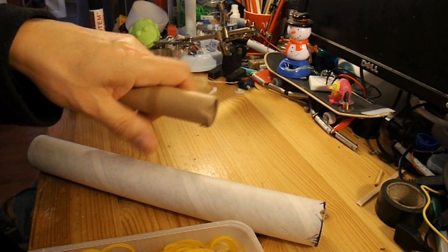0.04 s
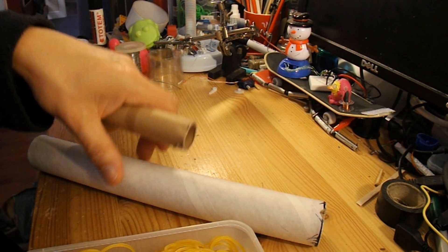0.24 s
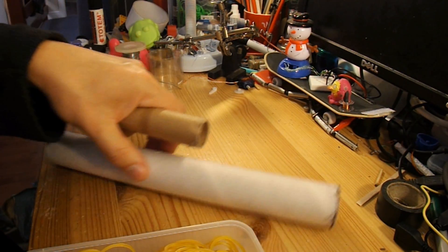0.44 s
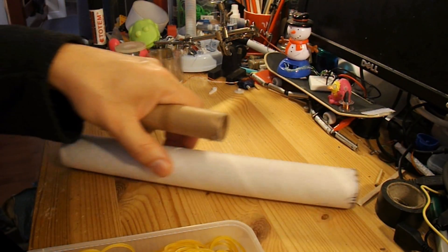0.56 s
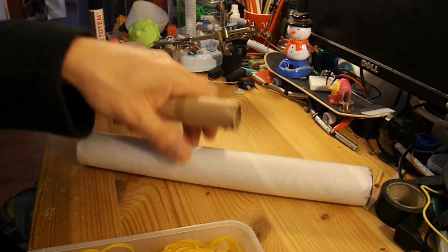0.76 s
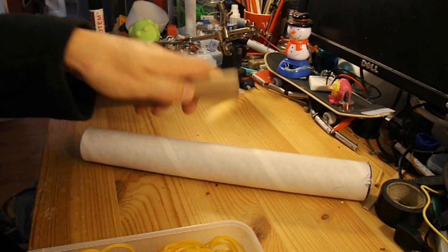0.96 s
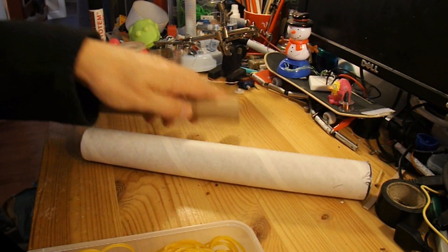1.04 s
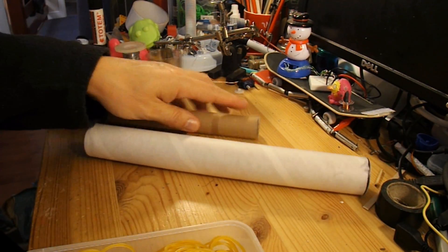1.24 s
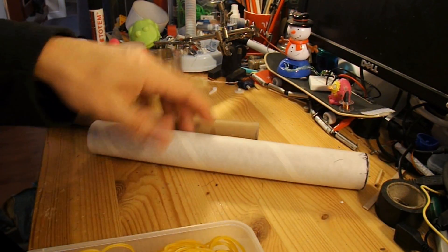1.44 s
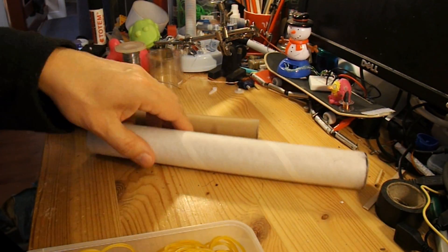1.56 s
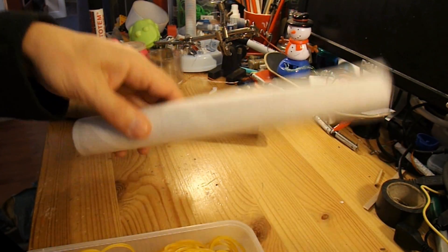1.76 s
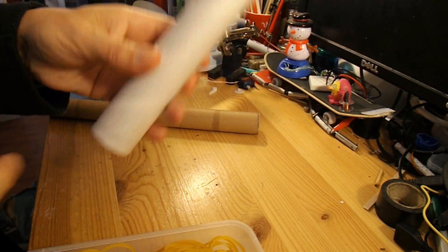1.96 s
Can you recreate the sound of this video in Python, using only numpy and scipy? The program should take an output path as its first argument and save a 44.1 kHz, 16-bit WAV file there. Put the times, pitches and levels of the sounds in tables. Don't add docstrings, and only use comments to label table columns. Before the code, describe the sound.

Close and nearly mono in a small quiet room: faint papery handling and scraping, a crisp tiny tick, a quick cluster of hollow cardboard knocks on wood, then only light skin-on-paper rustle over soft hiss.

```python
import sys
import numpy as np
from scipy import signal
from scipy.fft import rfft, irfft
from scipy.io import wavfile

SR = 44100
rng = np.random.default_rng(int(sys.argv[2]) if len(sys.argv) > 2 else 0)


def natural_amplitude(level_db):
    exponent = np.asarray(level_db, float) / 20
    return 10 ** exponent


def to_wav(s):
    ch = np.atleast_2d(s).T
    pcm = np.round(np.clip(ch, -1, 1) * 32767)
    wavfile.write(sys.argv[1], SR, pcm.astype(np.int16))


N = 88508

# [f/Hz, level/dB]
HUSH_SPECTRUM = [(25, -34), (120, -18.5), (400, -3), (2500, -5.5), (6600, -8.5), (9000, -7.5), (13500, -14),
                 (16000, -10.5)]
# [t/s, rumble level/dB]
ARM_WEIGHT = [(0, -90), (.1, -98), (.33, -93), (.42, -80), (.53, -73), (.6, -86), (.72, -98), (.8, -81),
              (0.921, -104), (1.2, -98), (1.4, -92), (1.52, -74), (1.65, -79.5), (1.699, -88), (1.85, -89),
              (1.95, -81), (2.01, -88)]
# [f/Hz, level/dB]
RUMBLE_SPECTRUM = [(15, -40), (35, -24), (70, -9.5), (100, -3.5), (140, 1), (175, -18), (300, -60)]
# [start t/s, peak t/s, end t/s, tube-on-wood level/dB, skin-on-paper level/dB]
HAND_MOVES = [(-.1, -0.012, 0.1, -65, -57.5), (0.026, 0.13, 0.24, -70, -61.5), (0.1, 0.235, 0.29, -71, -65),
              (0.347, .41, 0.41, -66, -61), (0.385, 0.511, 0.51, -53.5, -55),
              (0.47, 0.564, 0.61, -55, -52.5), (0.591, 0.639, 0.717, -56.5, -56),
              (0.652, 0.695, 0.77, -53.5, -53.5), (0.694, 0.772, 0.9, -67, -61.5),
              (0.903, .965, 1.06, -64, -55), (0.963, 1.097, 1.177, -63, -58),
              (1.11, 1.253, 1.22, -60.5, -58.5), (1.23, 1.268, 1.58, -55.5, -58.5),
              (1.51, 1.507, 1.71, -65, -55), (1.553, 1.634, 1.664, -62, -56),
              (1.61, 1.723, 1.817, -73, -54), (1.792, 1.833, 1.99, -70.5, -63),
              (1.864, 1.97, 2.15, -62.5, -62)]
# [f/Hz, level/dB]
SKIN_SPECTRUM = [(700, -67), (2500, -9), (3200, -16.5), (4200, -7), (5500, -4.5), (6600, 0.5), (8000, -3.5),
                 (15500, -20.5)]
# [f/Hz, width/Hz, level/dB]
SLIDE_RESONANCES = [(130, 12.4, -29), (330, 270, -4.5), (582, 230, -3), (943, 320, 0), (1423, 370, 0.5),
                    (2390, 370, -1), (3925, 200, -4)]
# [t/s, level/dB, f/Hz, ring/ms]
BURSTS = [(0.0821, -56, 1000, 5.9), (0.5093, -39.5, 8700, 1.3), (0.5638, -49, 3970, 3.1),
          (0.725, -42, 7300, 2.6), (0.9097, -36.5, 8300, 0.24), (0.9197, -23, 7240, 0.44),
          (.9366, -16.5, 7570, 0.36), (0.9417, -29, 5250, 0.47), (0.9642, -45, 6400, 0.14),
          (1.0362, -52.5, 3240, 1.6), (1.61, -53, 1505, 9.2), (0.536, -51.5, 403, 6.1),
          (.538, -48.5, 273.3, 4), (.547, -45.5, 393, 3.8), (0.55, -64, 310, 11), (.712, -60.5, 364, 29),
          (0.734, -60, 331, 20), (.76, -65.5, 314, 18), (.455, -61, 3850, 14), (0.489, -58, 3760, 27),
          (.548, -62, 3950, 9.1), (.575, -56, 3880, 12), (.625, -58, 2460, 14), (1.3806, -11.5, 1060, 1.27),
          (1.4175, -21, 730, 1.46), (1.522, -58, 1890, 7.2), (1.385, -36.5, 1658, 8.8),
          (1.323, -34.5, 420, 7.3), (1.274, -43, 880, 11), (1.296, -52, 1510, 8), (1.3266, -31, 2430, 6.7),
          (1.327, -37, 2900, 3.7), (1.333, -38.5, 2630, 8), (1.383, -23.5, 1055, 7.8), (1.381, -32, 610, 9),
          (1.382, -29, 1330, 7.7), (1.248, -36, 2130, 4.8), (1.248, -41, 570, 9), (.528, -53, 2320, 6),
          (.528, -55, 4370, 5), (1.252, -40, 2600, 5.6), (1.308, -39, 955, 5), (1.406, -34, 793, 11),
          (1.402, -27, 1136, 4.7), (1.458, -44.5, 414, 6.5), (1.906, -55, 470, 10), (1.905, -63, 269, 31)]
# [f/Hz, level/dB, t60/s]
DESK_TAIL = [(60, 10.5, 0.22), (141, 4, 0.72), (318, 3.5, 0.35), (610, 4, 0.17), (1150, 5, 0.15),
             (2450, 1, 0.19), (5000, 4.5, 0.21), (11800, -3, 0.2)]
# [t/s, board level/dB, tube level/dB, rim level/dB, crack level/dB]
BLOWS = [(.347, -57, -61.5, -66, -69), (0.4126, -57.5, -58.5, -71, -50.5), (0.5295, -51, -52.5, -52.5, -42),
         (.961, -55.5, -57, -74, -54.5), (1.2481, -29.5, -28, -32, -35.5), (1.2508, -54, -32.5, -40, -65),
         (1.2756, -38.5, -48, -60, -56), (1.292, -34.5, -42, -53, -41.5), (1.309, -34.5, -36.5, -75, -41.5),
         (1.3238, -25, -46, -34, -24.5), (1.3272, -36, -27, -31.5, -37.5), (1.3305, -36, -26.5, -37, -32),
         (1.38, -24.5, -29, -36, -21.5), (1.3829, -33.5, -24, -33, -69), (1.3871, -37, -21.5, -29.5, -30),
         (1.403, -37.5, -32.5, -36.5, -51), (1.419, -33.5, -36, -44, -34), (1.408, -39, -43, -40, -52),
         (1.4234, -38.5, -28, -47, -63), (1.437, -60, -40.5, -50, -50), (1.447, -42.5, -55, -51, -62),
         (1.461, -55, -58, -68, -62), (1.526, -57, -71, -70, -59), (1.576, -55.5, -73, -59, -74),
         (1.955, -56.5, -69, -65, -82)]
# [f/Hz, level/dB, t60/s]
BOARD_MODES = [(151.7, -19.5, 0.14), (262, -9, 0.082), (433, -8, 0.045), (500, -8, 0.014), (570, 3, 0.032),
               (634, -8, 0.065), (732, -15.5, 0.08)]
# [f/Hz, level/dB, t60/s]
TUBE_MODES = [(936, -11, 0.036), (1000, -2.5, 0.034), (1046, -2, 0.028), (1080, -6, 0.021),
              (1232, -10.5, 0.04), (1330, -13.5, 0.019), (1612, -9.5, 0.039), (1030, -9, 0.0083)]
# [f/Hz, level/dB, t60/s]
RIM_MODES = [(2130, 3, 0.018), (2430, 7.5, 0.0092), (2600, 1.5, 0.033), (2810, -3.5, 0.03),
             (3104, -5, 0.024), (3970, -10.5, 0.046), (4700, -26, .02)]
# [f/Hz, level/dB]
CRACK_SPECTRUM = [(1470, -37), (2500, -11), (4190, -6), (4840, -11.5), (6630, -7), (7990, -13.5),
                  (9710, -21.5), (15000, -40)]

HUSH_DB = -62.5
RISE_MS = 0.91


def evened(x):
    return x / np.sqrt(np.mean(x ** 2) + 1e-20)


def read(points, hz, axis=1):
    p = np.array(points, float)
    return np.interp(np.log(hz + 1), np.log(p[:, 0] + 1), p[:, axis])


def add(mix, s, sound):
    part = mix[round(s * SR):][:len(sound)]
    part += sound[:len(part)]


def coloured(x, points):
    gain = natural_amplitude(read(points, np.fft.rfftfreq(len(x), 1 / SR)))
    return evened(irfft(rfft(x) * gain, len(x)))


def resonate(x, hz, width):
    return signal.lfilter(*signal.iirpeak(hz, hz / width, SR), x)


def high_pass(x, order, hz):
    return signal.lfilter(*signal.butter(order, hz, "high", fs=SR), x)


def room():
    t = np.arange(N) / SR
    whine_hz, whine_db, warm_s = 9778.7, -62.5, 0.23
    whine_gain = natural_amplitude(whine_db - 2 * np.exp(-t / warm_s)) * np.sqrt(2)
    whine = whine_gain * np.sin(2 * np.pi * whine_hz * t)
    return natural_amplitude(HUSH_DB) * coloured(rng.standard_normal(N), HUSH_SPECTRUM) + whine


def rumble():
    s, db = np.transpose(ARM_WEIGHT)
    weight = natural_amplitude(np.interp(np.arange(N) / SR, s, db))
    return weight * coloured(rng.standard_normal(N), RUMBLE_SPECTRUM)


def grit():
    grains_per_s, grain_db = 4000, 1.5
    size = natural_amplitude(grain_db * np.minimum(rng.exponential(1, N), 4))
    grains = size * (rng.random(N) < grains_per_s / SR)
    return rng.standard_normal(N) * (0.48 + grains)


def effort(axis):
    t = np.arange(N) / SR
    power = np.zeros(N)
    for move in HAND_MOVES:
        swell = np.sin(np.pi / 2 * np.interp(t, move[:3], [0, 1, 0])) ** 2
        power += (natural_amplitude(move[axis]) * swell) ** 2
    return np.sqrt(power)


def stroke():
    return effort(axis=4) * coloured(grit(), SKIN_SPECTRUM)


def slide():
    low_cut = signal.butter(4, 105, "high", fs=SR, output="sos")
    scrape = signal.sosfilt(low_cut, grit())
    patch_db, patch_s = 1.5, 0.015
    t, knots = np.arange(N) / SR, np.arange(0, N / SR + 1, patch_s)
    patches = rng.standard_normal((len(SLIDE_RESONANCES), 400))
    total = np.zeros(N)
    for k, (hz, width, db) in enumerate(SLIDE_RESONANCES):
        grip = patch_db * np.interp(t, knots, patches[k, :len(knots)])
        gain = (-1) ** k * natural_amplitude(db + grip) * np.sqrt(250 / width)
        total += gain * resonate(scrape, hz, width)
    return effort(axis=3) * evened(total)


def desk(x):
    hz, t, z = signal.stft(rng.standard_normal(SR // 2), SR, nperseg=256)
    level, t60 = read(DESK_TAIL, hz)[:, None], read(DESK_TAIL, hz, axis=2)[:, None]
    tail = signal.istft(z * natural_amplitude(level - 60 * t / t60), SR, nperseg=256)[1]
    tail = tail * np.minimum(np.arange(len(tail)) / (0.00095 * SR), 1)
    return signal.fftconvolve(x, tail / np.linalg.norm(tail))[:N]


def ticks():
    out, t = np.zeros(N), np.arange(8000) / SR
    for s, db, hz, ms in BURSTS:
        u = t * 1000 / ms
        burst = (2 * u * np.exp(1 - 2 * u)) ** 2
        add(out, s, natural_amplitude(db) * burst * np.sin(2 * np.pi * hz * t))
    echo_db, echo_t60, desk_db = -15.5, 0.015, -18.5
    echo = resonate(rng.standard_normal(8000), 7300, 1010)
    echo = echo * natural_amplitude(-60 * t / echo_t60) * np.clip(t / 0.0019 - 0.3, 0, 1)
    out = high_pass(out, 2, 203)
    flutter = signal.fftconvolve(out, echo)[:N]
    return out + natural_amplitude(echo_db) * flutter + natural_amplitude(desk_db) * desk(out)


def ring(modes, detune, flip=1):
    t = np.arange(8000) / SR
    tone = np.zeros(len(t))
    for k, ((hz, db, t60), d) in enumerate(zip(modes, detune)):
        tone += flip ** k * natural_amplitude(db - 60 * t / t60) * np.sin(2 * np.pi * hz * d * t)
    return tone * np.sin(np.pi / 2 * np.minimum(t * 1000 / RISE_MS, 1)) ** 2


def knocks():
    spots = np.zeros((3, N))
    t = np.arange(1024) / SR
    detune, crack_t60, desk_db = 0.014, 0.017, -8
    chance = rng.standard_normal((len(BLOWS), 1100))
    for k, (s, board_db, tube_db, rim_db, crack_db) in enumerate(BLOWS):
        spot = spots[k % len(spots)]
        d = 1 + detune * chance[k, 1024:]
        board = natural_amplitude(board_db) * ring(BOARD_MODES, d)
        tube = natural_amplitude(tube_db) * ring(TUBE_MODES, d[20:])
        rim = natural_amplitude(rim_db) * ring(RIM_MODES, d[40:], flip=-0.94)
        add(spot, s, board + tube + rim)
        fade = natural_amplitude(crack_db - 60 * t / crack_t60) * np.minimum(t * 1000 / RISE_MS, 1)
        add(spot, s, fade * coloured(chance[k, :1024], CRACK_SPECTRUM))
    wet = sum(spot + natural_amplitude(desk_db) * desk(spot) for spot in spots)
    return high_pass(wet, 1, 674)


def scene():
    mono = knocks() + ticks() + slide() + stroke() + room() + rumble()
    apart_db, port_lag = -50, 1
    own = [natural_amplitude(HUSH_DB + apart_db) * coloured(rng.standard_normal(N), HUSH_SPECTRUM) for _ in "LR"]
    return np.array([np.roll(mono, port_lag), mono]) + own


def top_cut(x):
    return signal.sosfilt(signal.butter(12, 16460, fs=SR, output="sos"), x)


def record(dry):
    band_limit = signal.firwin(255, 16350, fs=SR)
    narrow = signal.oaconvolve(dry, band_limit[None], "same")
    return top_cut(narrow)


dry = scene()
out = record(dry)
to_wav(out)
```